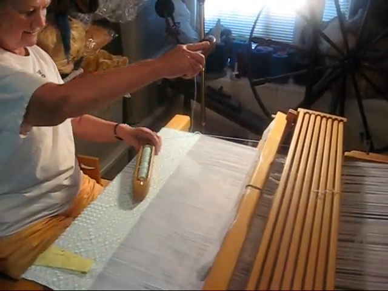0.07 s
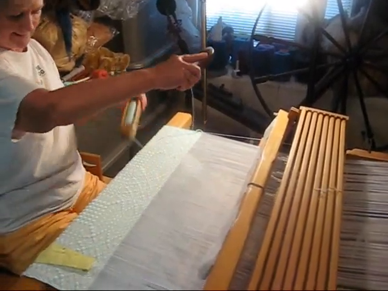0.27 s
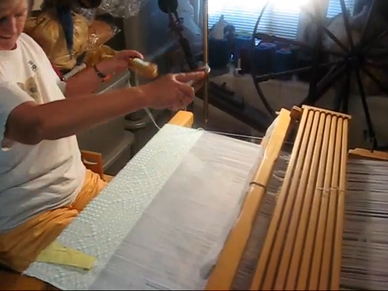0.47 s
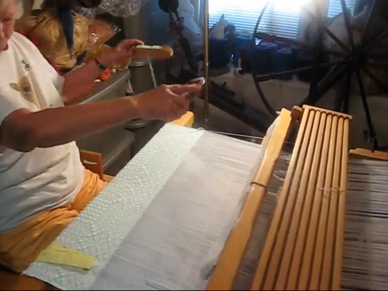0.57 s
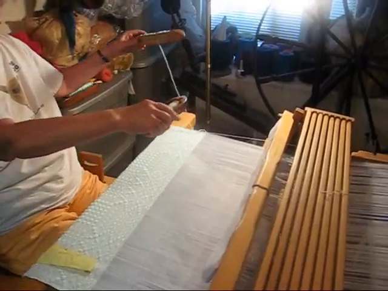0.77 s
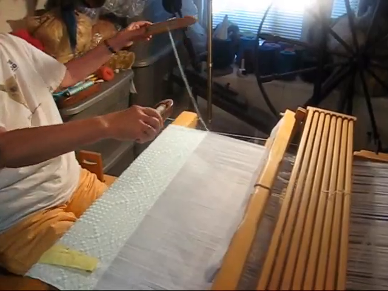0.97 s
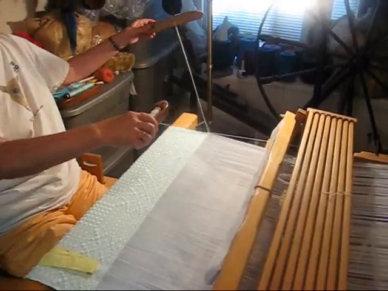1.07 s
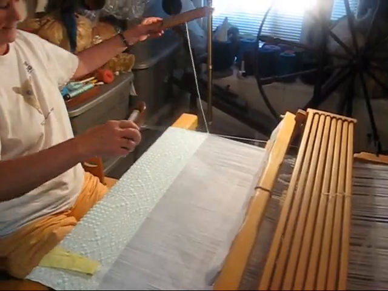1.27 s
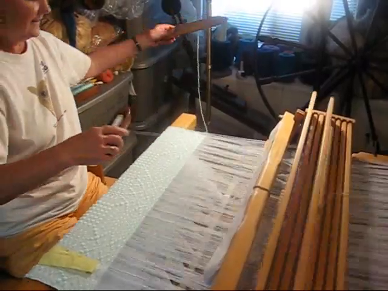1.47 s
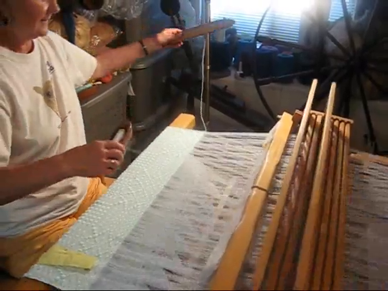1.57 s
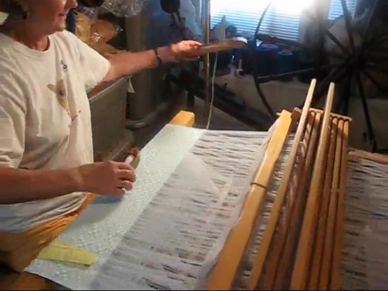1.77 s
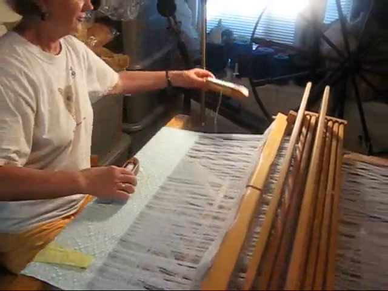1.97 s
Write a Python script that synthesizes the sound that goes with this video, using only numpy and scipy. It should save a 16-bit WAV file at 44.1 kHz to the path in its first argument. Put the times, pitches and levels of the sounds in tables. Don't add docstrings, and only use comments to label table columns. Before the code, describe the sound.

Wooden loom clatter in a small room: dry shuttle knocks, bobbin rattle, jingling heddles, gritty sound

```python
import sys
import numpy as np
from scipy import signal
from scipy.io import wavfile
from scipy.ndimage import uniform_filter1d

SR = 44100
rng = np.random.default_rng(int(sys.argv[2]) if len(sys.argv) > 2 else 0)


def unload_audio(sound):
    columns = np.transpose(np.atleast_2d(sound))
    steps = np.round(np.clip(columns, -1, 1) * 32767)
    wavfile.write(sys.argv[1], SR, steps.astype(np.int16))


def convert_level_to_amplitude(level_db):
    exponent = np.asarray(level_db, float) / 20
    return 10 ** exponent


N = 89302


def level(x, db):
    return x * convert_level_to_amplitude(db) / np.sqrt(np.mean(x ** 2))


def band(x, hz, width):
    return signal.lfilter(*signal.iirpeak(hz, hz / width, SR), x)


def walk(rate):
    k = int(SR / rate)
    held = np.repeat(rng.standard_normal(N)[:N // k + 1], k)
    return 1.3 * uniform_filter1d(uniform_filter1d(held, k), k)[:N]


def curve(rows):
    s, db = np.array(rows).T
    return convert_level_to_amplitude(np.interp(np.arange(N) / SR, s, db, left=-90, right=-90))


def add(out, x, s):
    i = int(s * SR)
    out[i:i + len(x)] += x[:N - i]


def room():
    # frequency in Hz, density in dB per Hz.
    rumble_spectrum = [(30, -32.5), (60, -13), (110, -25.5), (255, -6), (380, -9.5), (520, -17.5),
                       (800, -18), (3000, -35)]
    # time in seconds, level in dB.
    hum_level = [
        (0, -50),
        (.2, -47),
        (1.35, -47),
        (1.45, -55),
        (1.9, -57.5),
        (2.02, -48),
    ]
    rumble_db, hum_hz, whine_hz, whine_db = -42, 120.4, 5010, -64.5

    rumble, swell = 0, walk(2.3)
    at, db = np.array(rumble_spectrum).T
    for hz in 30 * 2 ** np.arange(0, 7, 1 / 3):
        gain = convert_level_to_amplitude(np.interp(np.log(hz), np.log(at), db) + 0.88 * swell + 1.5 * walk(15))
        rumble = rumble + gain * band(band(rng.standard_normal(N), hz, hz / 3), hz, hz / 3)

    hum = np.sin(2 * np.pi * np.cumsum(hum_hz + 1.4 * walk(11)) / SR)
    hum = hum * curve(hum_level) * convert_level_to_amplitude(4.5 + 2.0 * walk(15))
    whine = convert_level_to_amplitude(whine_db) * level(band(rng.standard_normal(N), whine_hz, 60), 0)
    return level(rumble, rumble_db) + hum + whine


def squeaks():
    # start in seconds, length in seconds, pitch in Hz, level in
    # dB.
    slips = [(0.201, 0.0038, 2020, -38.5), (0.215, 0.0077, 4080, -38), (0.289, 0.016, 1366, -31.5),
             (0.286, 0.0067, 1658, -28.5), (0.322, 0.0062, 1990, -30.5), (0.716, 0.03, 388, -26.5),
             (0.812, 0.029, 373, -35), (0.877, .018, 373, -29), (0.911, 0.029, 384, -31.5),
             (0.95, 0.031, 381, -31), (1.045, 0.026, 385, -25), (1.081, 0.19, 382.7, -45.5),
             (1.259, 0.0066, 2250, -34.5), (1.277, 0.0063, 2545, -30.5), (1.293, .012, 2450, -29.5),
             (1.312, .013, 1606, -28), (1.321, 0.012, 850, -24.5), (1.316, 0.0099, 2480, -34),
             (1.41, 0.025, 161, -26), (1.422, 0.014, 2036, -22), (1.421, 0.019, 932, -24.5),
             (1.448, 0.018, 1970, -25.5), (1.434, 0.032, 2112, -23.5), (1.453, 0.019, 953, -27.5),
             (1.464, 0.027, 2133, -24), (1.47, .036, 1596, -33.5), (1.528, 0.0082, 348, -30),
             (1.51, 0.017, 2117, -29), (1.566, 0.029, 1165, -36), (1.579, .03, 4180, -37.5),
             (1.606, .015, 2605, -27), (1.618, 0.0071, 3790, -41), (1.632, 0.013, 2600, -39),
             (1.662, 0.03, 286, -28), (1.737, 0.0066, 2100, -29), (1.75, 0.025, 158, -32),
             (1.88, 0.057, 2100, -39)]
    out, waver, flutter = np.zeros(N), walk(300), walk(350)
    for s, length, hz, db in slips:
        n, i = int(length * SR), int(s * SR)
        detune = waver[i:i + n] - waver[i:i + n].mean()
        stutter = flutter[i:i + n] - flutter[i:i + n].mean()
        tone = np.sin(2 * np.pi * np.cumsum(hz * (1 + .01 * detune)) / SR)
        add(out, convert_level_to_amplitude(db + 2.5 * stutter) * signal.windows.tukey(n, .6) * tone, s)
    return out


def knocks(rows):
    # frequency in Hz, level in dB, decay time T60 in seconds.
    modes = [(382.4, -15.5, 0.085), (546, -14, 0.016), (800, -8, 0.018), (913, -13.5, 0.012),
             (1146, -11, 0.0084), (1356, 2, 0.0091), (1588, -0.5, 0.015), (1930, 3, 0.016),
             (2410, 2, 0.0091), (2982, 6.5, .006), (3590, 2.5, 0.014), (4230, -5, 0.01), (4520, -10, 0.019),
             (5360, -4.5, 0.014)]
    points, touches_per_s, rise_s, first_touch = 4, 6000, 0.00048, 0.99
    scatter_db, detune, dulling_db = 3, .08, -2
    own_ring_db, own_ring_t60_s, treble_t60_s = -4, .022, 0.013

    out, t = np.zeros(N), np.arange(SR // 8) / SR
    hz, db, t60 = np.array(modes).T[:, None, :, None]
    t60 = np.where(hz > 2500, np.minimum(t60, treble_t60_s), t60)
    point = np.arange(points)[:, None]
    for s, peak_db, own_hz, decay, tilt in rows:
        chance = rng.standard_normal((2, points, len(modes), 1))
        touch = rng.random((3, len(t)))

        octaves = np.log2(np.maximum(hz, 800) / 1000)
        gain = convert_level_to_amplitude(db + scatter_db * chance[0] + (tilt + dulling_db * point[:, None]) * octaves)
        mode_hz = hz * (1 + detune * np.minimum(hz / 1500, 1) * chance[1])
        ring = (gain * np.sin(2 * np.pi * mode_hz * t) * convert_level_to_amplitude(-60 * t / t60)).sum(axis=1)
        own_ring = convert_level_to_amplitude(own_ring_db - 60 * t / own_ring_t60_s) * np.sin(2 * np.pi * own_hz * t)
        ring += np.sqrt(np.sum(gain ** 2, axis=1)) * own_ring

        decay = np.clip(decay, .004, .4)
        hits = (touch[0] < touches_per_s / SR) * (2 * touch[1] - 1)
        hits = hits * convert_level_to_amplitude(-60 * t / decay) * np.minimum(t / rise_s, 1)
        hits[0] = first_touch
        where = (points * touch[2] * np.minimum(6 * t / decay, 1)).astype(int)
        where = np.minimum(where, points - 1)

        x = signal.fftconvolve(ring, hits * (where == point), axes=1).sum(axis=0)
        loudest = np.sqrt(uniform_filter1d(x ** 2, size=200).max())
        add(out, x * convert_level_to_amplitude(peak_db - 7.5) / loudest, s)
    return out


def shuttle_knocks():
    # start in seconds, level in dB, own ring in Hz, chatter decay in seconds, tilt in dB per octave.
    blows = [(0.218, -22.5, 963, 0.077, -4), (0.236, -17.5, 865, 0.041, -11),
             (0.245, -17, 864, 0.035, -9.5), (0.259, -24, 750, 0.025, -10), (0.28, -18, 3655, 0.021, 11.5),
             (0.288, -18.5, 1605, 0.03, -8), (0.302, -25.5, 1860, 0.0095, -0.5),
             (0.312, -36.5, 1310, 0.053, -2), (0.389, -14.5, 1395, 0.043, 0.5),
             (0.397, -23.5, 818, 0.054, -1), (0.71, -7, 1410, 0.022, 1.5), (0.714, -12.5, 817, 0.044, 1.5),
             (0.717, -11, 1415, 0.026, -0.5), (0.723, -17.5, 1424, 0.012, 8), (0.749, -18, 930, 0.03, -6.5),
             (0.782, -24, 1390, 0.065, -9), (0.797, -24, 790, 0.051, 0), (0.814, -29, 904, 0.034, -8),
             (0.837, -25, 560, 0.025, -15), (0.857, -17.5, 800, 0.029, -3), (0.87, -21.5, 913, 0.041, -8),
             (0.902, -20.5, 1370, 0.023, -5.5), (0.908, -20.5, 800, 0.043, -4),
             (0.942, -23, 1380, 0.038, -8), (0.98, -13, 976, 0.022, 5), (0.985, -17.5, 1950, 0.042, -6),
             (1.0, -17.5, 1080, 0.054, -1), (1.028, -26, 873, 0.1, 4.5), (1.034, -14.5, 1420, 0.03, 0),
             (1.039, -13.5, 1423, 0.041, -3)]
    return knocks(blows)


def bumps():
    # start in seconds, level in dB, own ring in Hz, chatter decay in seconds, tilt in dB per octave.
    blows = [
        (.691, -28, 1400, .05, -7),
        (.837, -23, 1350, .05, -5),
        (1.278, -31, 1600, .07, -3),
        (1.421, -16, 930, .09, -2),
        (1.441, -17, 900, .06, -2),
        (1.455, -17, 960, .1, -2),
        (1.747, -17, 640, .08, -5),
        (1.372, -24, 900, .06, -4),
        (1.383, -25, 880, .05, -4),
    ]
    return knocks(blows)


def rattle(body, per_s, spread_db):
    chance = rng.random((3, N))
    sign = np.sign(chance[1] - .5)
    clicks = (chance[0] < per_s / SR) * sign * convert_level_to_amplitude(-spread_db * np.log(chance[2] + 0.02))
    patchy_db = 2
    rings = (convert_level_to_amplitude(db + patchy_db * walk(60)) * level(band(clicks, hz, width), 0) for hz, width, db in body)
    return level(sum(rings), 0)


def bobbin():
    # frequency in Hz, bandwidth in Hz, level in dB.
    hollow = [(383.4, 37, 3.5), (559, 85, 6.5), (823, 160, 0.5), (830, 74, -9), (1420, 130, -2.5),
              (1900, 550, -9), (2450, 130, -7.5), (3880, 1200, -18.5)]
    # time in seconds, level in dB.
    unwinding = [
        (0.72, -42),
        (0.756, -35),
        (0.8, -32.5),
        (0.878, -31),
        (0.925, -38.5),
        (0.97, -43.5),
        (1.03, -28),
        (1.09, -46),
    ]
    return convert_level_to_amplitude(-4.5) * curve(unwinding) * rattle(hollow, 1600, 3)


def heddles_lifted():
    # frequency in Hz, bandwidth in Hz, level in dB.
    metal = [(887, 140, -5), (1016, 76, -6.5), (1610, 150, -12), (1995, 370, -10), (2100, 200, -1),
             (2460, 260, -16.5), (2940, 1400, -0.5), (3830, 1100, -1.5), (4770, 2600, 0.5), (5770, 1500, 1)]
    # time in seconds, level in dB.
    lift = [
        (1.25, -55),
        (1.262, -51.5),
        (1.33, -51.5),
        (1.388, -27),
        (1.468, -29),
        (1.566, -47),
        (1.586, -41),
        (1.638, -47.5),
        (1.65, -25),
    ]
    return convert_level_to_amplitude(7.0) * curve(lift) * rattle(metal, 4000, 0.92)


def frame_knocks():
    # start in seconds, level in dB, own ring in Hz, chatter decay in seconds, tilt in dB per octave.
    blows = [(1.262, -27.5, 2470, 0.11, -7.5), (1.317, -19, 860, 0.078, -6), (1.33, -21, 570, 0.13, -11.5),
             (1.648, -10, 2800, 0.0083, 6.5), (1.651, -10, 800, 0.042, 2), (1.657, -5.5, 2512, 0.032, 5.5),
             (1.661, -11, 637, 0.022, 2), (1.667, -19, 800, 0.039, -4), (1.672, -14.5, 1730, 0.027, -3.5),
             (1.676, -17, 490, 0.031, -6), (1.698, -24.5, 2980, 0.068, 0), (1.706, -22, 920, 0.06, 11),
             (1.736, -21, 4900, 0.1, 7), (1.745, -9.5, 2550, 0.015, 3.5), (1.748, -12, 1883, 0.043, -3),
             (1.758, -19.5, 1676, 0.027, 12), (1.768, -18.5, 646, 0.035, 0), (1.815, -31, 1380, 0.15, -16),
             (1.896, -28.5, 2100, 0.057, -1.5)]
    return knocks(blows)


def heddles_dropped():
    # frequency in Hz, bandwidth in Hz, level in dB.
    loose_parts = [(906, 300, -2), (1410, 830, -9.5), (2100, 1100, 3), (3240, 280, -6), (4260, 1500, 0),
                   (5520, 3800, -3)]
    # time in seconds, level in dB.
    drop = [
        (1.67, -45),
        (1.724, -37.5),
        (1.74, -40),
        (1.76, -33.5),
        (1.784, -45),
        (1.802, -39.5),
        (1.848, -58),
        (1.9, -50),
        (1.97, -58.5),
    ]
    return convert_level_to_amplitude(10.0) * curve(drop) * rattle(loose_parts, 3000, 1.4)


def echo(dry_loom):
    echo_db, t60_s, rise_s = -16, .11, 0.0051
    t = np.arange(SR // 3) / SR
    tail = band(rng.standard_normal(len(t)), 900, 2400) * convert_level_to_amplitude(-60 * t / t60_s) * np.minimum(t / rise_s, 1)
    return convert_level_to_amplitude(echo_db) * signal.fftconvolve(dry_loom, tail / np.sqrt(np.sum(tail ** 2)))[:N]


def scene():
    loom = squeaks() + shuttle_knocks() + bumps() + bobbin()
    loom = loom + heddles_lifted() + frame_knocks() + heddles_dropped()
    loom = signal.sosfilt(signal.butter(2, 280, "high", fs=SR, output="sos"), loom)
    return (loom + echo(loom) + room())[None]


def band_limit(x):
    return signal.sosfilt(signal.butter(12, 17020, fs=SR, output="sos"), x)


def record(dry):
    soft_clip, hold = 2.3, 4
    step, offset = 1 / 128, -.002
    x = signal.resample_poly(np.tanh(soft_clip * dry) / soft_clip, 1, hold, axis=1)
    x = np.repeat(np.round(x / step) * step + offset, hold, axis=1)[:, :N]
    x = signal.sosfilt(signal.ellip(8, .2, 50, 15800, fs=SR, output="sos"), x)
    return band_limit(x)


dry = scene()
out = record(dry)
unload_audio(out)
```